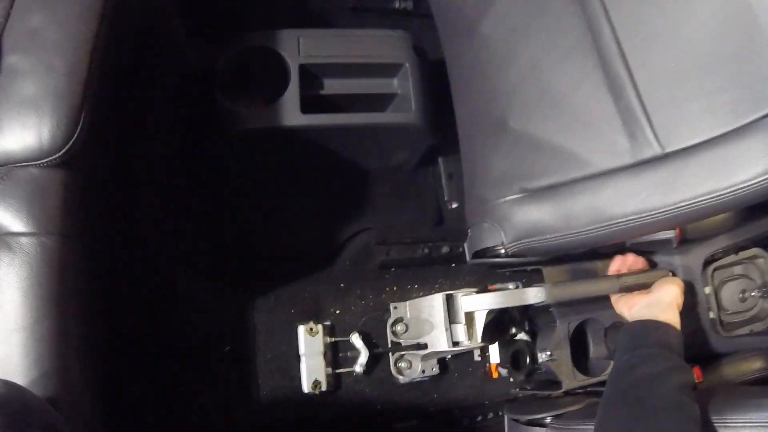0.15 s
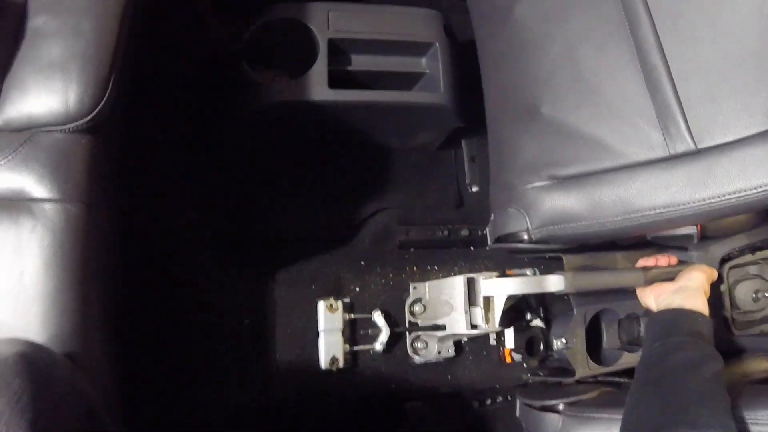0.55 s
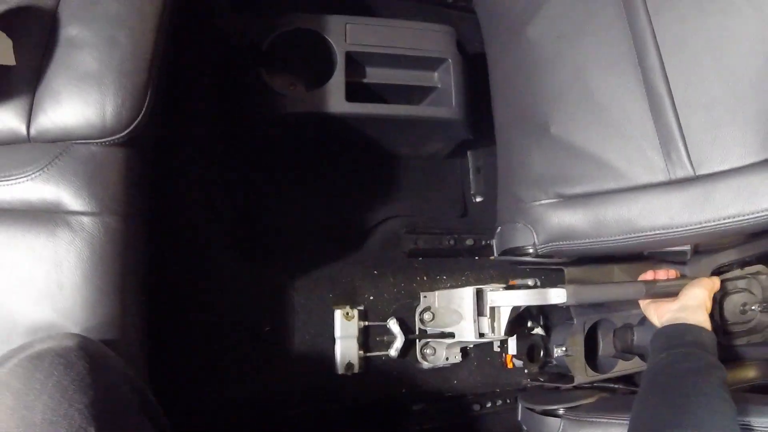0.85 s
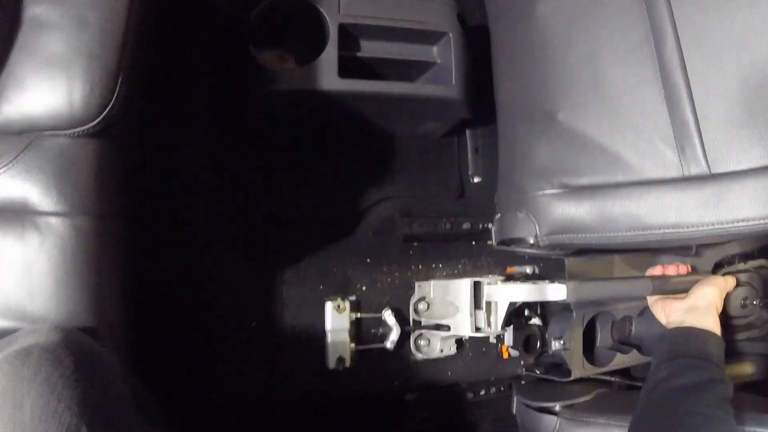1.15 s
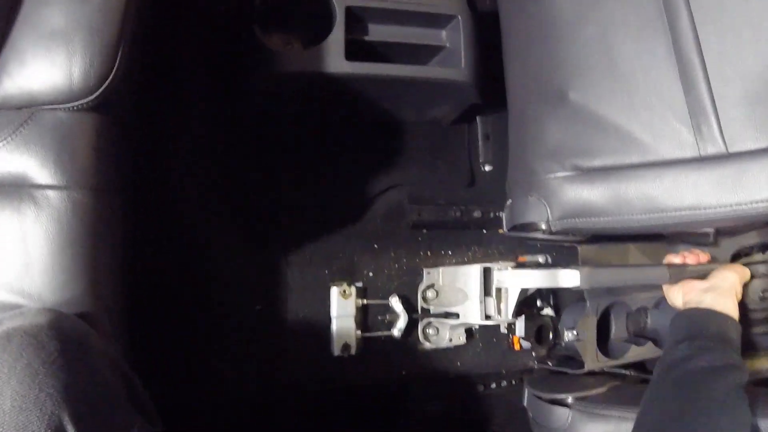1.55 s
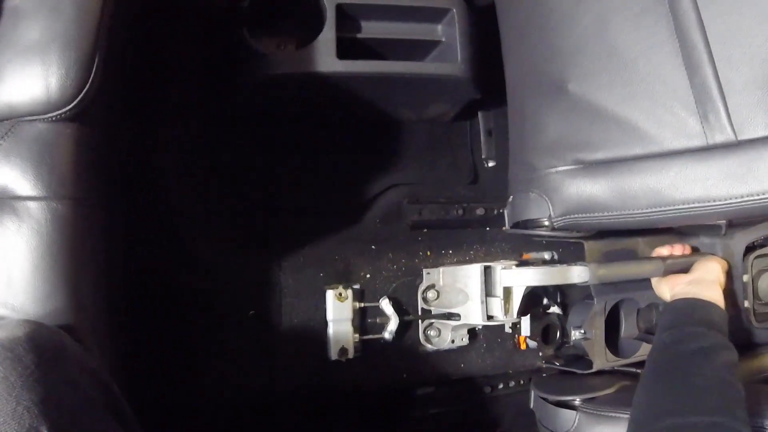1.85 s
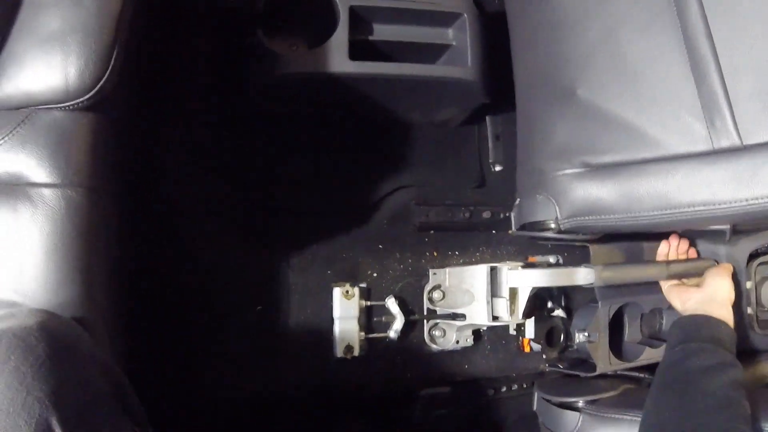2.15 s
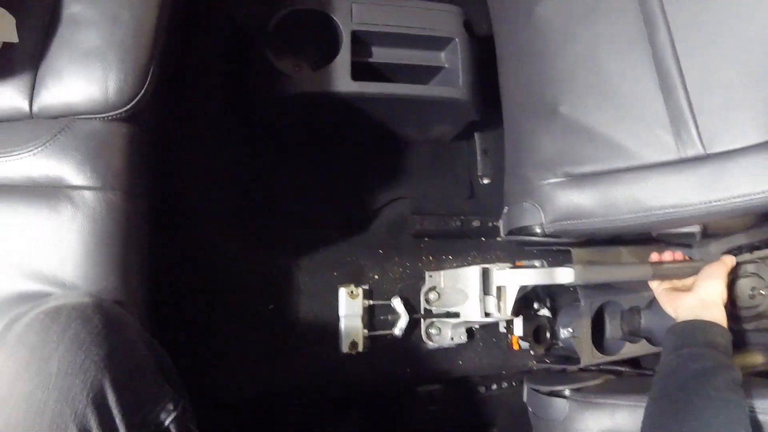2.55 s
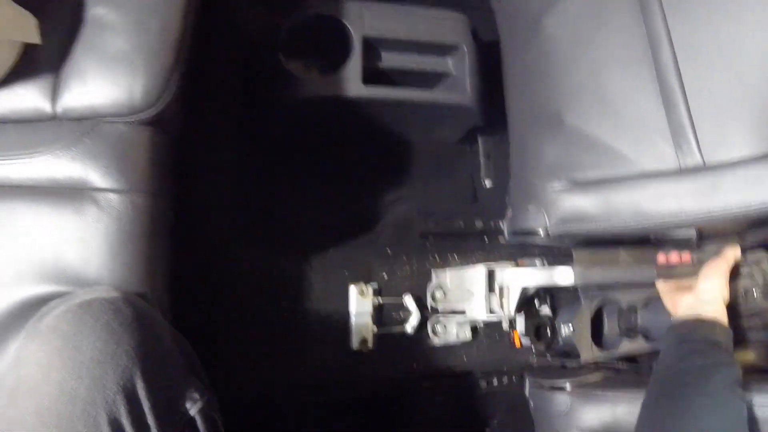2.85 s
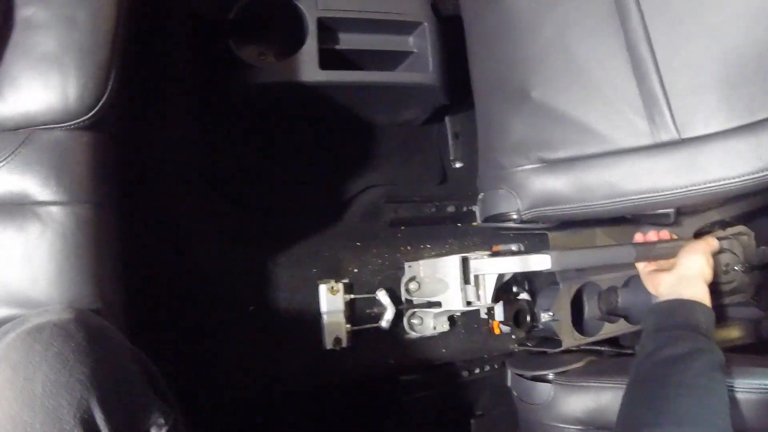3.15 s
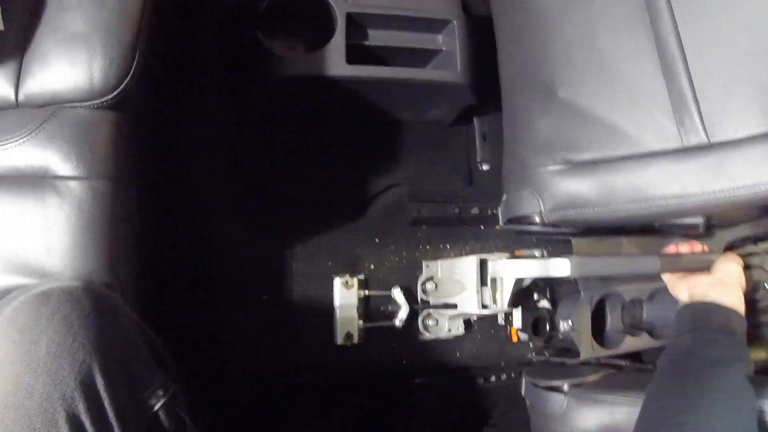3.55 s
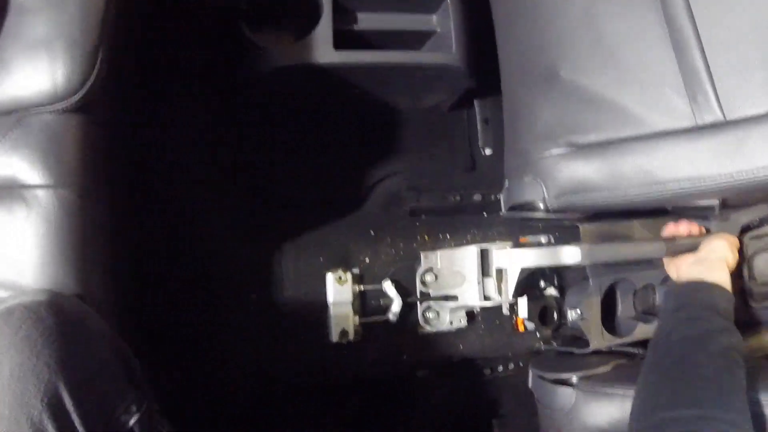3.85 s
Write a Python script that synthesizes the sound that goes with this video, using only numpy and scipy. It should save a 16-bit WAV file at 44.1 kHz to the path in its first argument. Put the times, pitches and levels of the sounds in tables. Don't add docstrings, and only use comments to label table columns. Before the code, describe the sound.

A handbrake lever is worked twice inside a closed car, miked closely. After faint rustle and a light button touch at 0.4 s, three bright ratchet snaps come at 0.65-0.76 s, two quick ones at 1.0 s, then a heavy clunk at 1.54 s. A button knocks at 1.9 s. Five more snaps run 2.6-2.95 s; a second clunk lands at 3.56 s, a small knock at 3.84 s. Trim rings briefly over low rumble and hiss.

```python
import sys
import numpy as np
from scipy import signal
from scipy.io import wavfile
from scipy.ndimage import map_coordinates

SR = 44100
rng = np.random.default_rng(int(sys.argv[2]) if len(sys.argv) > 2 else 0)


def materialize(psi):
    bounded = np.clip(np.atleast_2d(psi).T, -1, 1)
    quanta = np.round(bounded * 32767).astype(np.int16)
    wavfile.write(sys.argv[1], SR, quanta)


def to_linear_factor(level_db):
    exponent = np.asarray(level_db, float) / 20
    return 10 ** exponent


N = 176400


def rms_one(x):
    return x / np.sqrt(np.mean(x ** 2) + 1e-20)


def in_time(rows):
    return np.interp(np.arange(N) / SR, *np.transpose(rows))


def at_hz(points, hz):
    table_hz, value = np.transpose(points)
    return np.interp(np.log(hz), np.log(table_hz), value)


def bandpass(x, low_hz, high_hz, order=2):
    return signal.sosfilt(signal.butter(order, [low_hz, high_hz], "band", fs=SR, output="sos"), x)


def lowpass(x, hz):
    return signal.sosfilt(signal.butter(4, hz, fs=SR, output="sos"), x)


def drift(rate_hz):
    knots = rng.standard_normal(400)
    return map_coordinates(knots, [np.arange(N) / SR * rate_hz], order=3)


def bands():
    edges = 20 * 2 ** np.arange(0, 9.7, 1 / 3)
    white = rng.standard_normal((2, N))
    bank = []
    for k, (low, high) in enumerate(zip(edges, edges[1:])):
        bank.append((np.sqrt(low * high), bandpass(white[k % 2], low, high)))
    return bank


def noise(bank, spectrum, patchy_db, rate_hz):
    together = drift(rate_hz)
    low, top = spectrum[0][0] * .8, spectrum[-1][0] * 1.2
    out = np.zeros(N)
    for hz, band in bank:
        if low < hz < top:
            flicker = together + np.roll(together, int(hz * 7))
            out += to_linear_factor(at_hz(spectrum, hz) + patchy_db * flicker) * band
    return rms_one(out)


def strike(modes, s, db, damp=1, longest_s=.045):
    out = np.zeros(N)
    at = (np.asarray(s) * SR).astype(int)
    for k, (hz, level_db, t60) in enumerate(modes):
        chance_db = 1.6 * rng.standard_normal(len(at))
        clicks = np.full(N, 1e-18)
        np.add.at(clicks, at, to_linear_factor(db + level_db + chance_db))
        if hz > 2000:
            t60 = min(t60, longest_s)
        r = to_linear_factor(-60 / (max(damp * t60, .003) * SR))
        w = 2 * np.pi * hz / SR
        out += (-1) ** k * signal.lfilter([0, np.sin(w)], [1, -2 * r * np.cos(w), r * r], clicks)
    return out


def body(modes, rows, lag_s):
    s, db, weight_db = np.transpose(rows)
    return strike(modes, s + lag_s, db + weight_db)


# time_s, level_db
GRIP = [(0, -57.5), (.4, -52), (.78, -48.5), (.95, -56), (1.05, -41.5), (1.25, -48.5), (1.47, -57.5),
        (1.6, -41.5), (1.85, -56), (1.97, -50), (2.2, -53.5), (2.45, -51), (2.6, -47), (2.7, -47),
        (3.28, -57.5), (3.4, -53), (3.78, -56.5), (3.87, -49.5)]
# pitch_hz, density_db (per Hz)
RUMBLE = [(12, -30), (20, -1.5), (39, -4.5), (65, -7.5), (107, -13), (250, -45), (320, -73), (550, -120)]
# time_s, level_db
HISS_LEVEL = [(0.0, -63), (1.46, -64.5), (1.63, -66), (2.67, -68.5), (2.77, -66), (4.0, -67.5)]
# pitch_hz, density_db (per Hz)
HISS = [(180, -20.5), (300, -5), (991, 1.5), (1520, -1), (1820, -0.5), (4180, -11.5), (6510, -2.5),
        (12300, -13), (15000, -31.5)]


def microphone(bank):
    port_hz, port_width_hz, port_db = 6615, 160, -4
    b, a = signal.iirpeak(port_hz, port_hz / port_width_hz, fs=SR)
    port = to_linear_factor(port_db) * rms_one(signal.lfilter(b, a, rng.standard_normal(N)))
    hiss = to_linear_factor(in_time(HISS_LEVEL) - 4.0) * (noise(bank, HISS, patchy_db=0.36, rate_hz=6.5) + port)
    return hiss + to_linear_factor(in_time(GRIP)) * noise(bank, RUMBLE, patchy_db=1.3, rate_hz=2.7)


# time_s, level_db
MOVE = [(0, -64), (.3, -70), (.85, -67), (1.3, -68), (1.8, -72.5), (2.2, -72), (2.55, -64), (3.0, -64),
        (3.2, -73.5), (3.4, -65), (4, -72)]
# pitch_hz, density_db (per Hz)
RUSTLE = [(120, -5), (300, -3.5), (700, -9), (1500, -20.5), (3000, -22), (6000, -41), (9000, -45.5)]
# time_s, level_db
BRUSH = [(0, -75), (.15, -62.5), (.22, -71), (.4, -99), (.6, -93)]
# low_hz, high_hz
BRUSH_HZ = [4360, 7300]


def sleeve(bank):
    brush = to_linear_factor(in_time(BRUSH)) * rms_one(bandpass(rng.standard_normal(N), *BRUSH_HZ))
    return to_linear_factor(in_time(MOVE)) * noise(bank, RUSTLE, patchy_db=1.17, rate_hz=11.0) + brush


# peak_s, level_db, rise_s, fall_s
THUDS = [(0.005, -53, 0.02, 0.01), (0.411, -56.5, 0.038, 0.016), (.952, -62, 0.0029, 0.0054),
         (1.001, -39.5, 0.0076, 0.011), (1.204, -47, 0.025, 0.015), (1.423, -55.5, 0.0018, 0.034),
         (1.526, -48.5, 0.0091, 0.039), (1.703, -53.5, 0.0091, 0.022), (1.868, -56.5, 0.0046, 0.017),
         (1.913, -48, 0.0052, 0.042), (3.399, -59, 0.019, 0.013), (3.44, -52, 0.0048, 0.023),
         (3.557, -51, 0.0055, 0.013), (3.72, -56, 0.023, 0.012), (3.846, -42, 0.0042, 0.018)]
# pitch_hz, density_db (per Hz)
THUD = [(120, 4), (330, -1), (750, -7), (1200, -15), (2000, -26)]


def thuds(bank):
    t = np.arange(N) / SR
    shape = np.zeros(N)
    for s, db, rise, fall in THUDS:
        shape += to_linear_factor(db) * np.exp(-np.where(t < s, ((s - t) / rise) ** 2, (t - s) / fall))
    return shape * noise(bank, THUD, patchy_db=0.0, rate_hz=86.0)


# start_s, peak_db, body_weight_db
TICKS = [
    (0.3931, -37, -4.5),
    (0.413, -47, -7),
    (1.9041, -21.5, -5.5),
    (1.9458, -41, 3),
    (3.8424, -33.5, 1.5),
]
# start_s, lower_modes_db, upper_modes_db
KNOCKS = [(0.393, -35, -32), (.3965, -41, -38), (0.4133, -38, -52), (1.8977, -45, -38), (1.902, -55, -46),
          (1.9041, -25, -13), (1.907, -33, -23), (1.9120, -43, -35), (1.918, -45, -37),
          (1.9447, -27.5, -34), (1.9480, -32.5, -46), (3.8405, -38, -48), (3.8421, -29, -30),
          (3.8460, -36, -46)]
# start_s, peak_db
SPECKS = [(.624, -43), (0.995, -40.5), (1.326, -48.5), (1.42, -51), (1.44, -45.5), (1.456, -42.5),
          (1.471, -46), (1.857, -48), (1.979, -45.5), (2.004, -46.5), (2.014, -44), (2.023, -51.5),
          (2.03, -41.5), (2.233, -53.5), (2.346, -49), (2.373, -48), (2.427, -55.5), (3.283, -42),
          (3.347, -43.5), (3.436, -48), (3.81, -56), (3.9274, -43.5), (3.9305, -50), (3.9455, -44.5)]
# pitch_hz, level_db, t60_s
LEVER = [(2340, -1.5, 0.013), (2600, -5.5, 0.026), (2892, -6.5, 0.021), (4300, -14, 0.0055),
         (4905, -12, 0.04), (5344, -7, 0.027), (5935, -10, 0.014), (6080, -14.5, 0.021),
         (6130, -11.5, 0.049), (6800, -21.5, 0.014), (8043, -36.5, 0.01)]
# pitch_hz, level_db, t60_s
BRACKET = [(343, -17, 0.079), (682, -7, 0.055), (940, -2.5, 0.025), (1036, -13.5, .07), (1116, -8, 0.064),
           (1310, -19.5, 0.011), (1478, -29, 0.1), (1645, -11, 0.036)]


def linkage():
    s, low_db, high_db = np.transpose(KNOCKS)
    speck_s, speck_db = np.transpose(SPECKS)
    knocks = strike(LEVER[:3], s, low_db) + strike(LEVER[3:], s, high_db)
    knocks += body(BRACKET, TICKS, lag_s=0.00326)
    return to_linear_factor(-11) * knocks + strike(LEVER, speck_s, speck_db - 9, damp=.3)


# pitch_hz, density_db (per Hz)
CRACK = [(120, -33.5), (200, -17.5), (1070, -1.5), (1380, -10.5), (3170, -3), (4000, -5), (6650, 2.5),
         (13700, -45.5), (15000, -63)]
# pitch_hz, t60_s
CRACK_T60 = [(200, 0.16), (1000, 0.076), (4000, 0.037), (12000, 0.043)]
# pitch_hz, density_db (per Hz)
CABIN = [(200, 1), (500, -1.5), (900, -2), (1500, -9), (1850, -10.5), (2400, -12), (4000, -15.5),
         (6500, -4), (12000, -39)]
# pitch_hz, t60_s
CABIN_T60 = [(200, 0.42), (1300, 0.31), (2500, 0.33), (4200, 0.32), (12000, 0.14)]


def crack_and_cabin(bank, rows, start, own):
    t = np.arange(SR // 2) / SR
    rise = 1 - np.exp(-t / 0.00024)
    out = np.zeros(N + SR)
    for hz, band in bank[9:]:
        crack = to_linear_factor(-3.0 + at_hz(CRACK, hz)) * to_linear_factor(-60 * t / at_hz(CRACK_T60, hz))
        cabin = to_linear_factor(-21.5 + at_hz(CABIN, hz)) * to_linear_factor(-60 * t / at_hz(CABIN_T60, hz))
        shape = rise * (crack + cabin)
        shared = band[start:start + len(t)]
        for s, db, weight_db in rows:
            at = int(s * SR)
            mine = band[at * 3 // 4:][:len(t)]
            mix = np.sqrt(1 - own) * shared + np.sqrt(own) * mine
            out[at:at + len(t)] += to_linear_factor(db + weight_db * (hz < 1600)) * shape * mix
    return out[:N]


# pitch_hz, level_db, t60_s
TRIM = [(527, -14.5, 0.21), (644, -16.5, 0.31), (801, -12, 0.15), (1020, -13, 0.23), (1213, -16.5, .16),
        (1325, -22.5, 0.21), (1545, -15.5, 0.14), (1613, -16, 0.11), (1776, -17, .15), (2005, -20.5, .16),
        (2284, -22.5, 0.12), (2392, -18.5, 0.11), (2783, -17.5, .09)]
# pitch_hz, level_db, t60_s
SPRING = [(13500, -45, .03), (14150, -43.5, .02), (11500, -51.5, 0.033)]


def trim_and_spring():
    s, db, weight_db = np.transpose(TEETH + STOPS + TICKS)
    share_db = np.repeat([-22, -23, -23.5], [len(TEETH), len(STOPS), len(TICKS)])
    trim = strike(TRIM, s + .004, db + weight_db + share_db, longest_s=1)
    return trim + strike(SPRING, s, db)


# centre_s, level_db, pitch_hz, half_width_s
SWAYS = [(1.02, -45.5, 77, 0.032), (1.10, -39, 20, 0.034), (1.206, -42, 46, 0.031),
         (1.254, -39.5, 33, 0.018), (1.361, -46, 46, 0.023), (1.558, -29.5, 51, 0.012),
         (1.604, -38, 47, 0.03), (2.53, -38.5, 24, .04), (2.61, -38.5, 33, .05), (3.391, -43, 118, 0.014),
         (3.415, -44, 96, 0.015), (3.58, -34.5, 71, 0.014), (3.633, -41, 45, .02),
         (3.867, -44.5, 105, 0.014), (0.411, -61, 330, 0.011), (.952, -54, 730, 0.0037),
         (1.208, -47, 316, 0.011), (1.515, -54.5, 280, .008), (1.868, -52, 660, 0.0057),
         (1.914, -41.5, 323, 0.0071), (1.965, -42, 68, 0.025), (3.458, -53.5, 294, 0.011),
         (3.849, -41.5, 680, 0.0057), (3.867, -45, 540, 0.0048)]


def sways():
    t = np.arange(N) / SR
    out = np.zeros(N)
    for s, db, hz, width in SWAYS:
        out += to_linear_factor(db) * np.exp(-((t - s) / width) ** 2) * np.cos(2 * np.pi * hz * (t - s))
    return out


# start_s, peak_db, body_weight_db
TEETH = [
    (0.6474, -20, -0.5),
    (0.692, -11.5, -0.6),
    (0.761, -12, 1.9),
    (1.0137, -12.5, 2.5),
    (1.0376, -11.5, -0.2),
    (2.6076, -14.5, 2),
    (2.6701, -12, 0.5),
    (2.8555, -12.5, 1.4),
    (2.9017, -12, 0.5),
    (2.951, -13, -0.5),
]
# pitch_hz, level_db, t60_s
PAWL = [(2090, -13.5, 0.079), (3210, -16.5, 0.074), (3910, -21.5, 0.022), (4440, -11, 0.023),
        (5050, -10.5, 0.04), (5500, -20, 0.071), (6020, -9, 0.11), (6060, 0.5, 0.058), (6634, 0, 0.085),
        (6890, -11.5, 0.11), (6860, -2.5, 0.04), (8505, -10.5, .025)]
# pitch_hz, level_db, t60_s
SNAP = [(5350, 0, 0.0029), (6443, 3, 0.0075), (6920, -3.5, 0.002), (3140, -10.5, 0.0079)]


def ratchet():
    s, db, _ = np.transpose(TEETH)
    bounce = np.arange(3)
    uneven = 1 + .02 * rng.standard_normal((len(TEETH), 3))
    contact_s = (s[:, None] + 0.0034 * bounce * uneven).ravel()
    contact_db = (db[:, None] - 7 * bounce).ravel()
    slip = strike(PAWL, s - 0.0018, db - 26.5)
    pawl = strike(PAWL, s, db - 3.0) + strike(SNAP, contact_s, contact_db + 4)
    return to_linear_factor(-9.5) * (slip + pawl + body(BRACKET, TEETH, lag_s=.001))


def hollow(rows, low_hz, high_hz, level_db, t60_s):
    t = np.arange(N) / SR
    shape = np.zeros(N)
    for s, db, _ in rows:
        age = np.maximum(t - s, 0)
        shape += (1 - np.exp(-age / .012)) * to_linear_factor(db + level_db - 60 * age / t60_s)
    return shape * rms_one(bandpass(rng.standard_normal(N), low_hz, high_hz, order=4))


# start_s, level_db
DUCKS = [
    (1.489, -6.5),
    (3.504, -7.5),
]


def ducking():
    t = np.arange(N) / SR
    recover_s = 0.4
    gain_db = np.zeros(N)
    for s, db in DUCKS:
        gain_db += db * (t > s) * np.exp(-np.maximum(t - s, 0) / recover_s)
    return to_linear_factor(gain_db)


# start_s, peak_db, body_weight_db
STOPS = [
    (1.5378, -9, 1.5),
    (3.5638, -10.5, 2.6),
]
# start_s, level_db, lower_modes_weight_db
LANDINGS = [(1.5357, -22, 2), (1.5374, -20, -4.5), (1.5381, -6, -2.5), (1.5404, -5.5, -8),
            (1.5414, -9.5, -6), (1.5455, -15.5, -7), (3.5605, -22.5, 0.1), (3.5649, -10, 3.2),
            (3.5650, -9.5, -0.5), (3.5651, -7, 1), (3.569, -14, 3)]
# pitch_hz, level_db, t60_s
FLOORPAN = [(64.7, -20, 0.23), (364, -10, 0.063), (535, -10, 0.12), (665, 1.8, 0.054), (767, -3.5, 0.042),
            (890, -5.5, 0.024), (1120, -16, 0.028), (1740, -13.5, 0.082)]


def stop():
    s, db, low_db = np.transpose(LANDINGS)
    lever = strike(LEVER[:3], s, db + low_db) + strike(LEVER[3:], s, db)
    floor = to_linear_factor(3.5) * body(FLOORPAN, STOPS, lag_s=0.00047)
    floor += to_linear_factor(-2.5) * body(FLOORPAN, STOPS, lag_s=-.002)
    return to_linear_factor(-14) * (lever + strike(SNAP, s, db - 7) + floor)


def scene():
    near, far = bands(), bands()
    background = ducking() * (sleeve(near) + microphone(far))
    specks = [(s, db, -8) for s, db in SPECKS]
    teeth = ratchet() + crack_and_cabin(near, TEETH, start=SR, own=.55)
    rest = stop() + linkage()
    rest += crack_and_cabin(near, STOPS, start=2 * SR, own=.55)
    rest += to_linear_factor(1.5) * crack_and_cabin(near, TICKS, start=SR, own=0.79)
    rest += to_linear_factor(-3.5) * crack_and_cabin(far, specks, start=SR, own=1)
    console = hollow(TEETH, low_hz=1000.5, high_hz=1648.5, level_db=-34, t60_s=0.283)
    sill = hollow(STOPS, low_hz=2000, high_hz=2601, level_db=-41, t60_s=0.35)
    mix = lowpass(teeth, 11700) + lowpass(rest, 9900) + thuds(near) + background
    return (mix + trim_and_spring() + sways() + console + sill)[None]


def roll_off(x):
    return signal.sosfilt(signal.butter(12, 15180, fs=SR, output="sos"), x)


def record(dry):
    mix = lowpass(dry, 13500)
    return roll_off(mix)


dry = scene()
out = record(dry)
materialize(out)
```